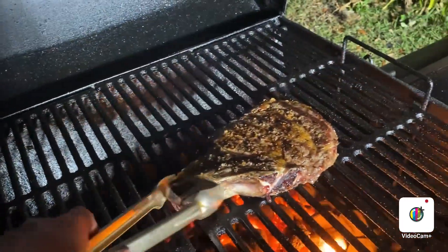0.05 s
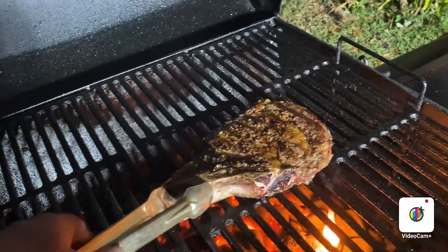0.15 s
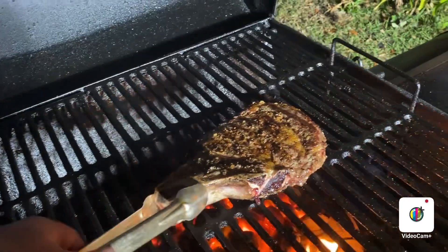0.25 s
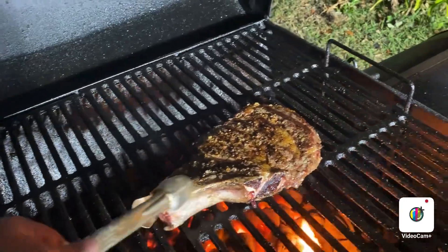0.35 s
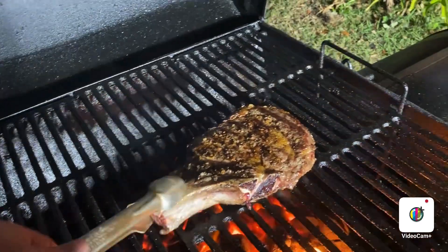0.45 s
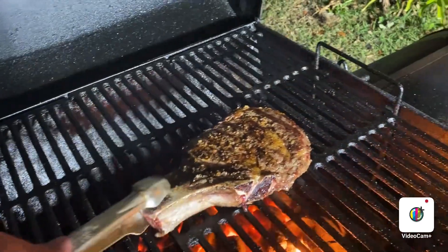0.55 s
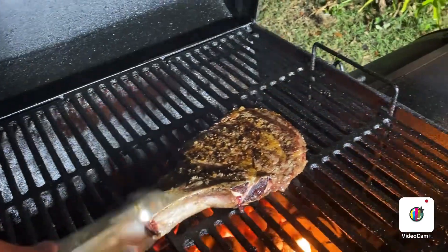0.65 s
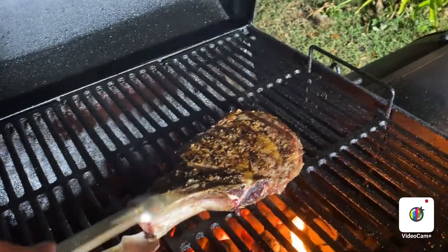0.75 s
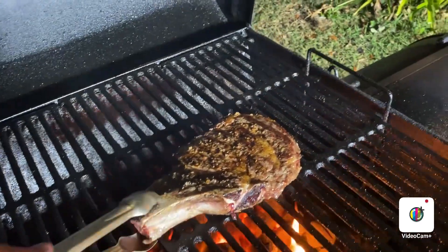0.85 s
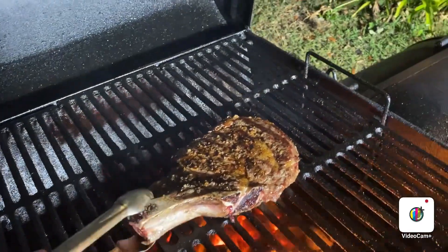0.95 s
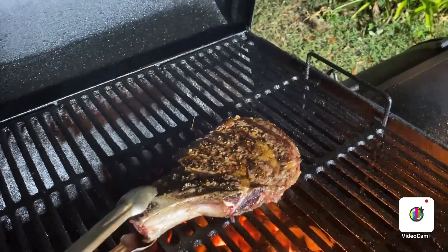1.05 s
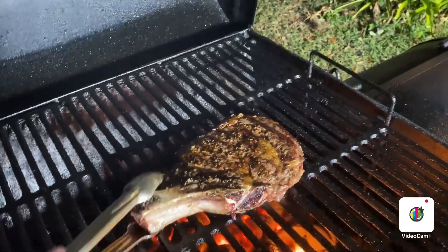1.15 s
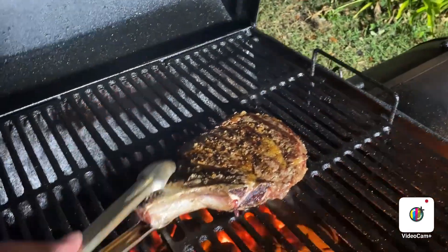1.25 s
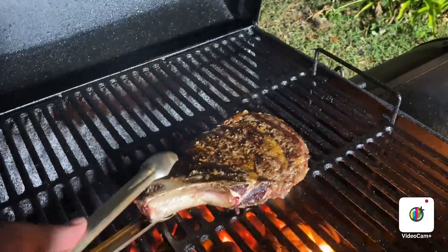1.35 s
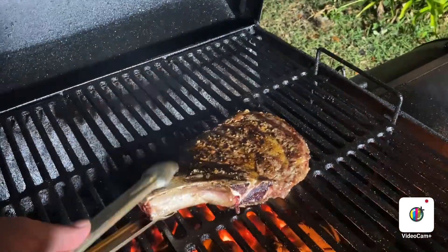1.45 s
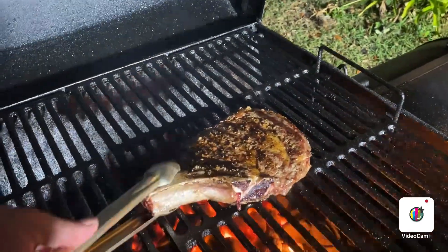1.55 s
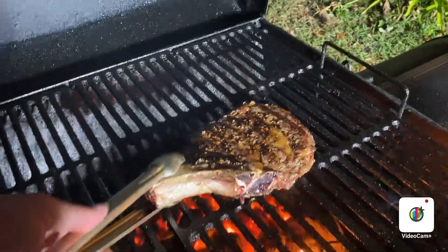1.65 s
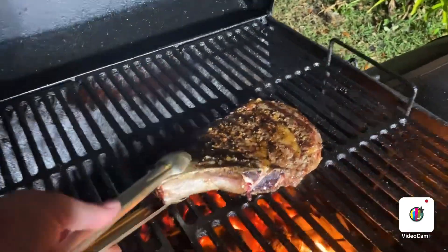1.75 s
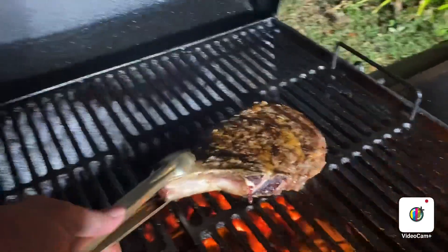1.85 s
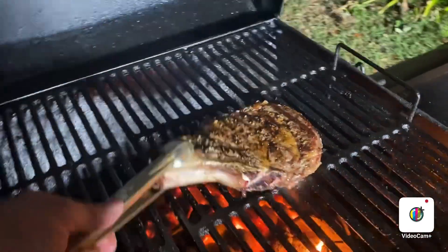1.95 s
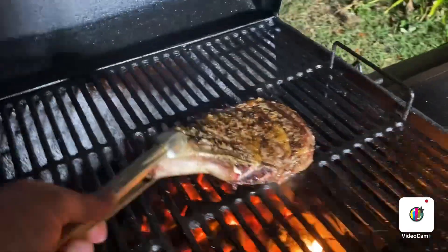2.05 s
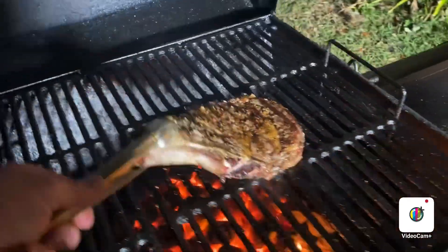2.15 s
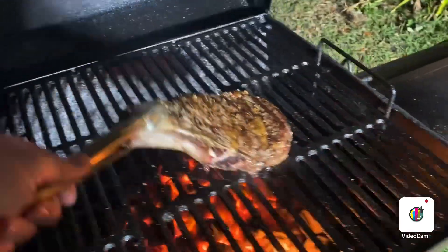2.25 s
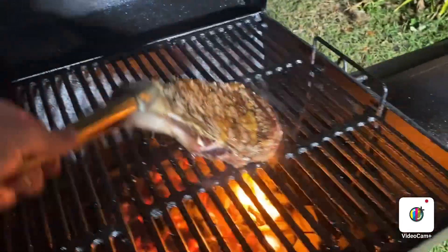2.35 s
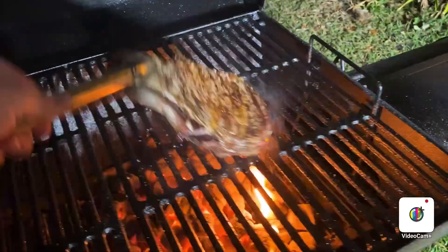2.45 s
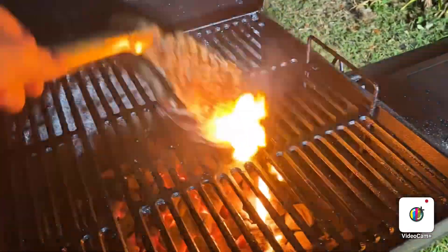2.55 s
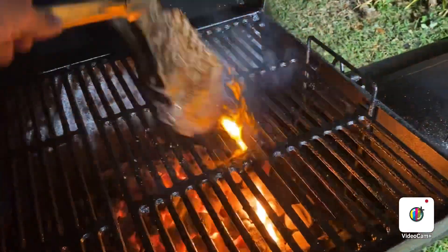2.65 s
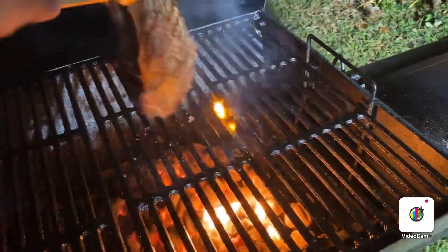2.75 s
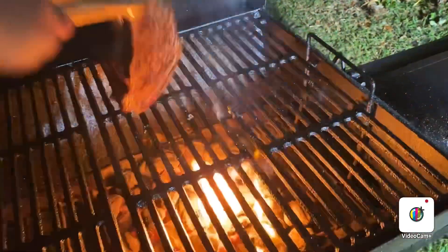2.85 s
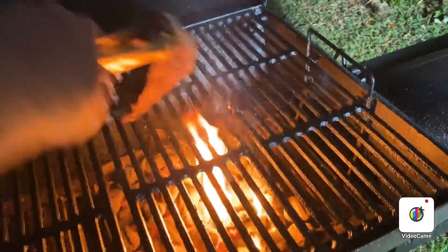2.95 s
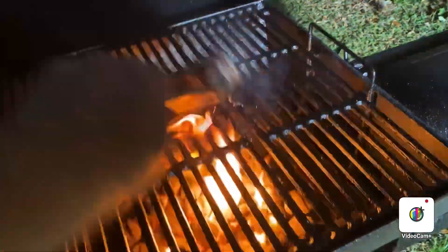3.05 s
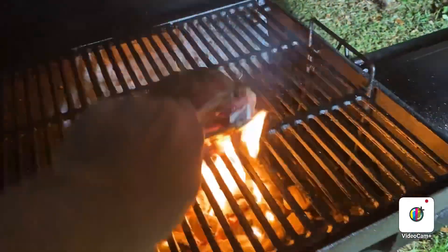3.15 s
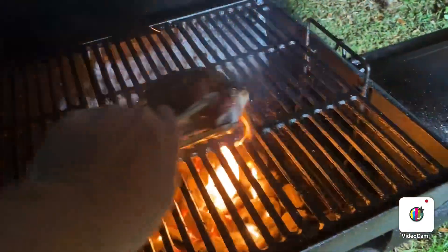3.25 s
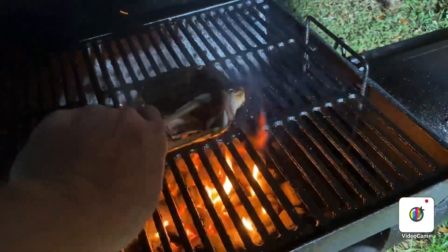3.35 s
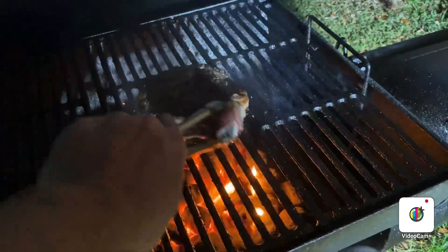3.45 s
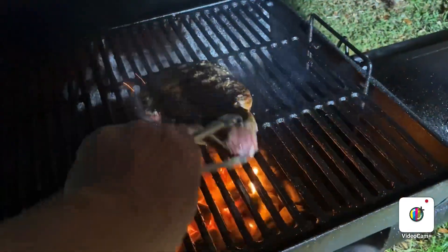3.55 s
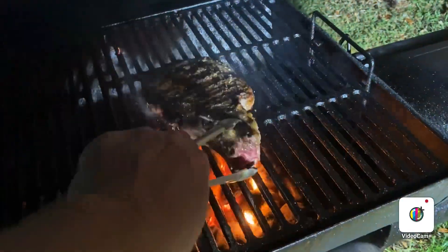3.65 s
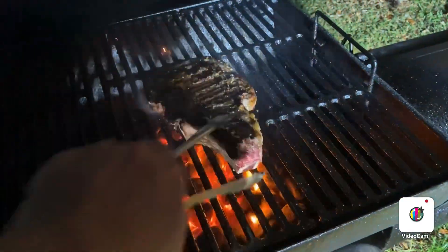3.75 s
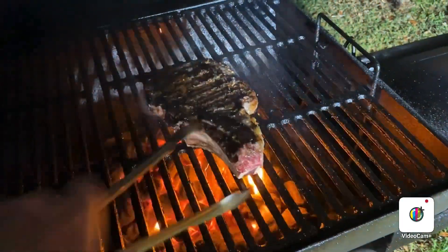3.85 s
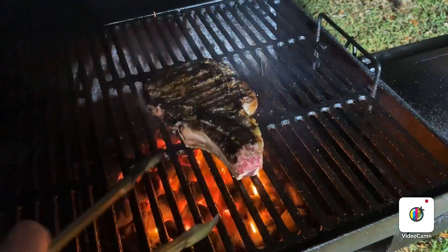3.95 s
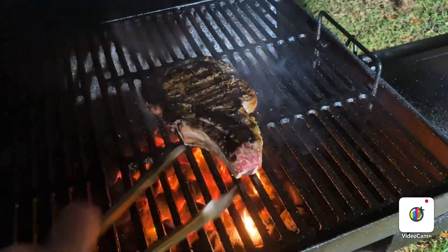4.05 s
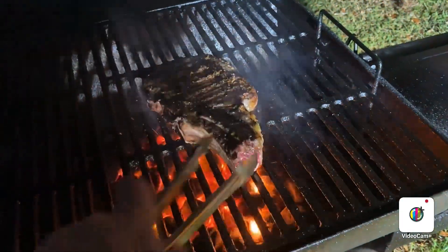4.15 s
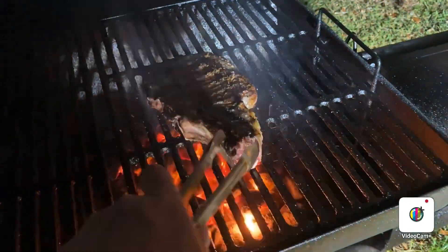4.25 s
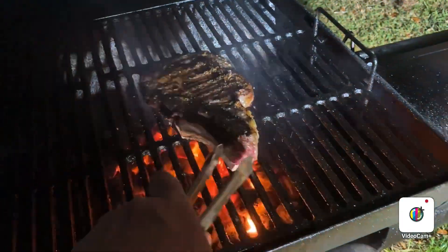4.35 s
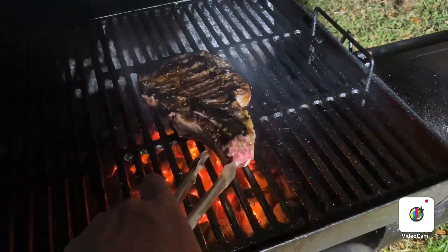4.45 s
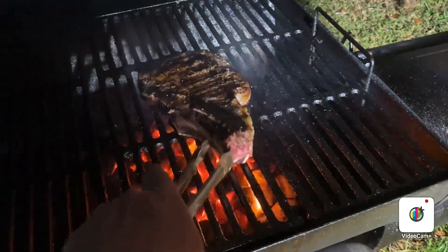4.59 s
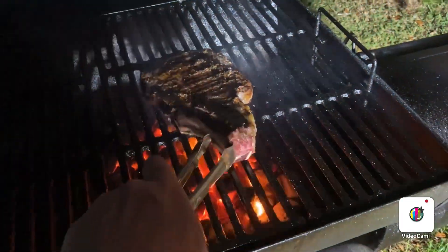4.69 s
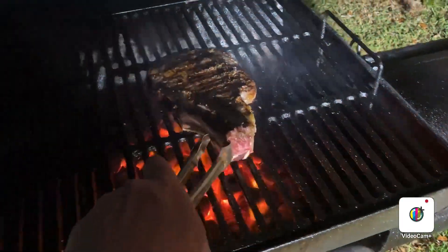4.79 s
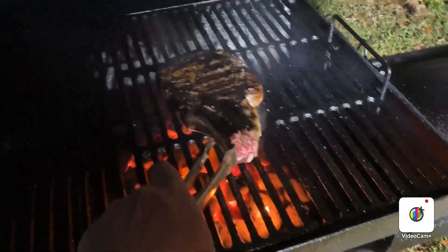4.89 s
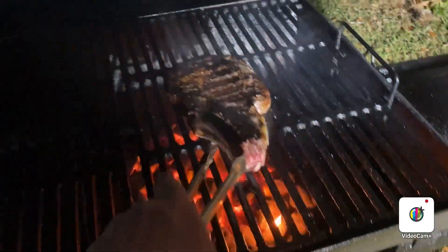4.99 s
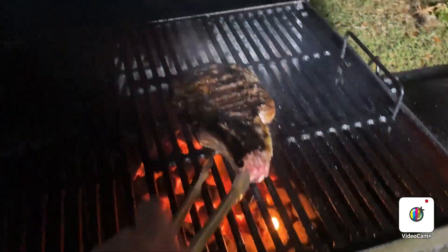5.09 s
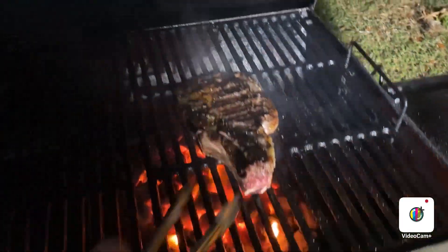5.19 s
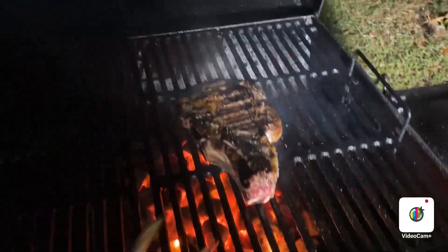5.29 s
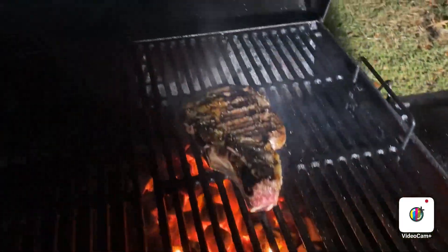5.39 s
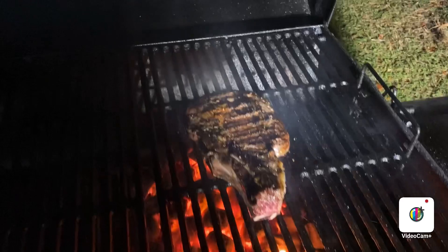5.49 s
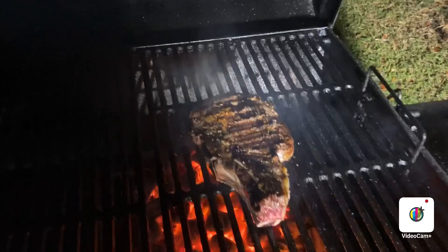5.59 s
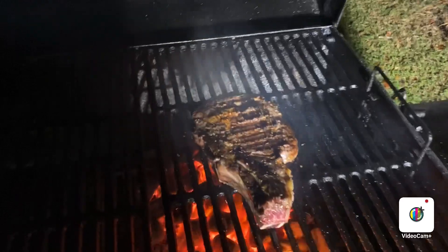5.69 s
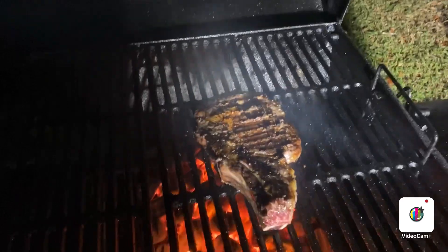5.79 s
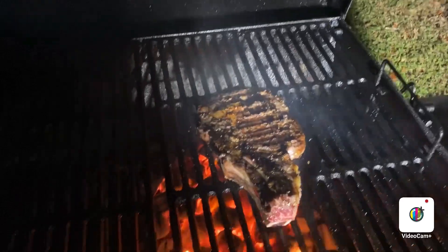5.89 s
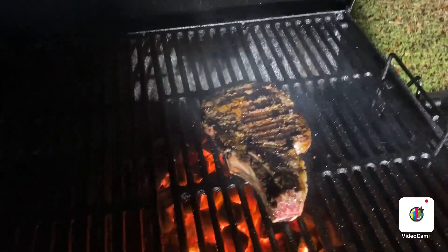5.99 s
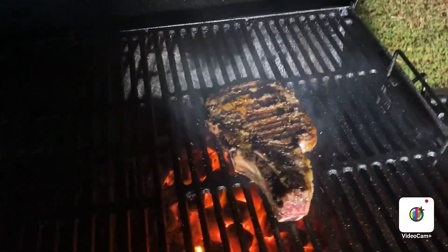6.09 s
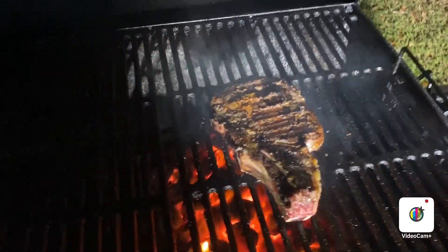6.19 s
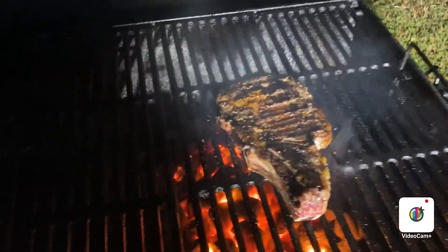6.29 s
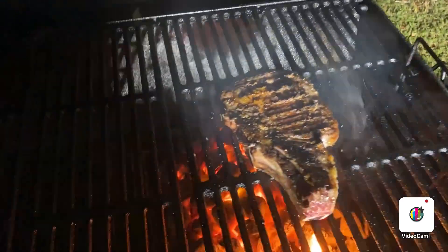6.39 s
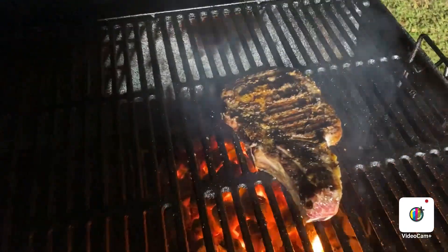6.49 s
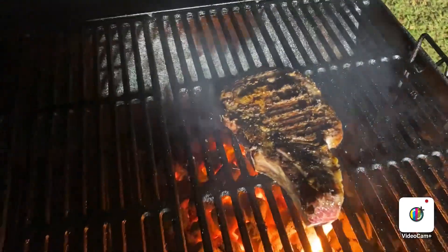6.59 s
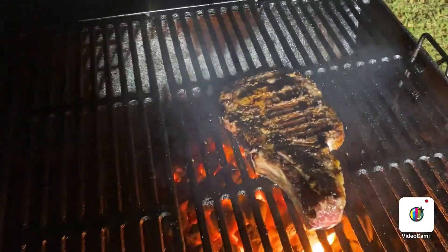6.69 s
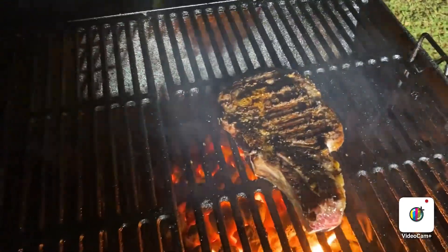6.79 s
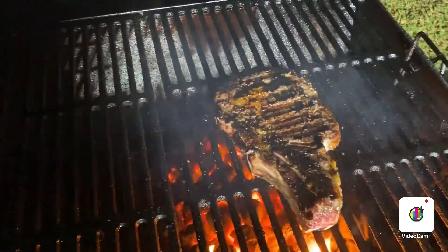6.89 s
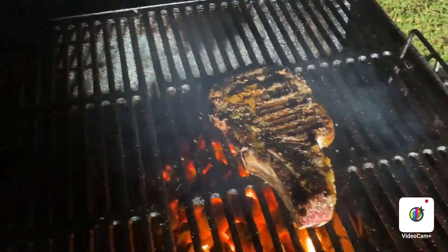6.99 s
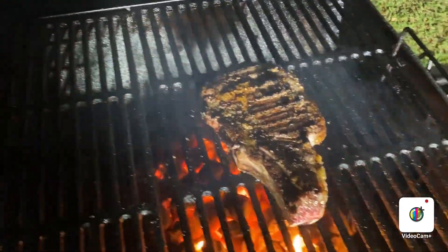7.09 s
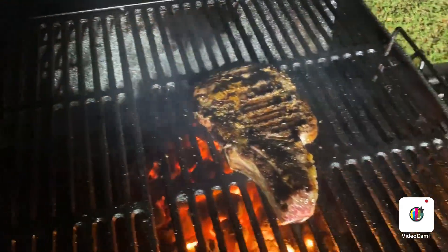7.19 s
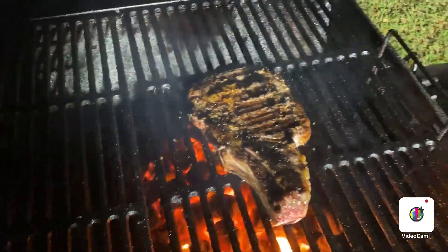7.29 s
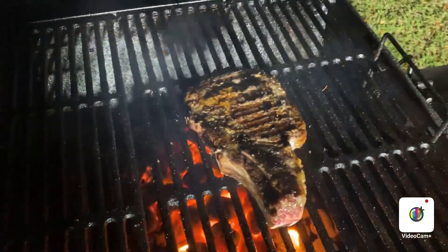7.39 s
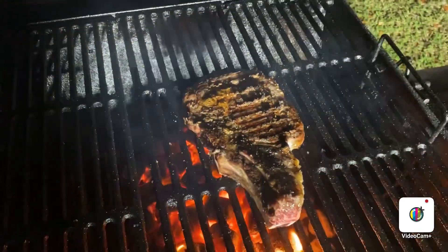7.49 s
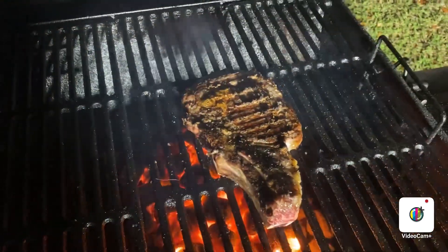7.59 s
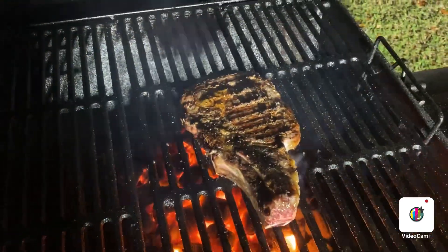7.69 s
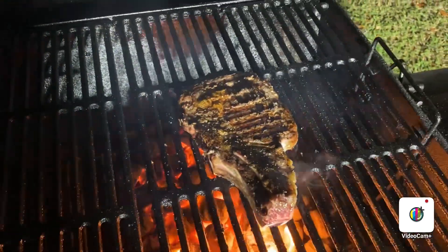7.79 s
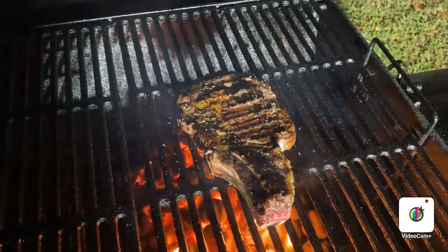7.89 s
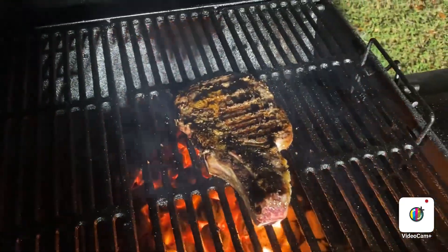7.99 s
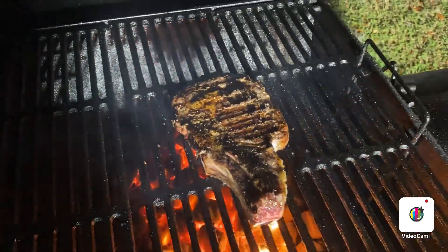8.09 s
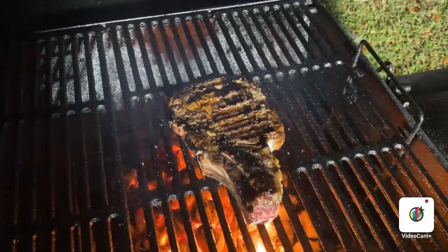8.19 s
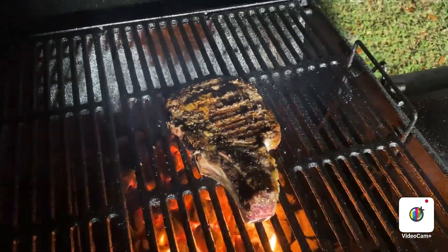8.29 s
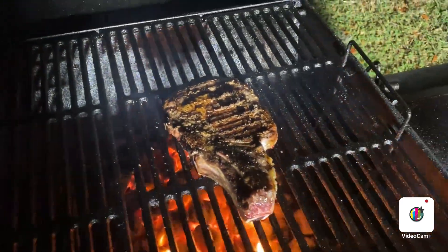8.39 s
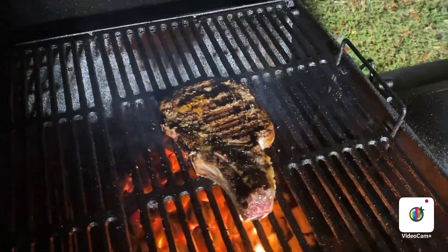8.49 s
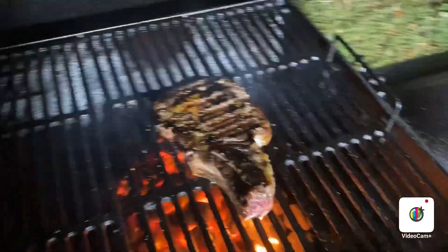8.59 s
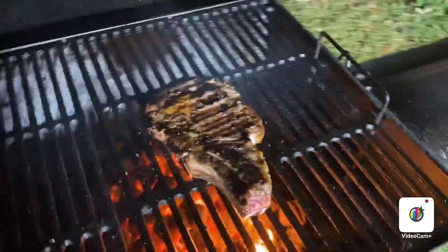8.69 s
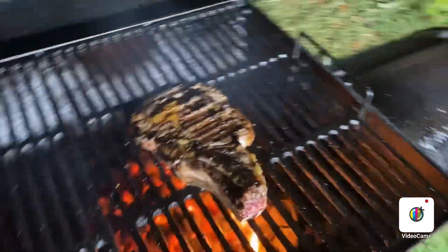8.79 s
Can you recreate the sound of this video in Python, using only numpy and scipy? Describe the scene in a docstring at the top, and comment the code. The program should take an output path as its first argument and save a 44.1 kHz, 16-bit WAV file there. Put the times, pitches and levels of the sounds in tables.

```python
"""A thick steak sizzles on a steel grate over charcoal, outdoors, heard through one small microphone.
From the start, fat and juice burst in tiny bubbles and spit, the fire box colours the lower sizzle,
and coals and far traffic rumble underneath. Steel tongs clack; near 2.5 s the steak lifts with dull
bumps and is turned. By 3.5 s it is back down: the sizzle swells and dripping fat lifts the fire's
breath. From 6.4 s three steam jets whistle; near 8.2 s the rumble swells briefly as the frying eases."""
import sys
import numpy as np
from scipy import signal
from scipy.fft import rfft, irfft, next_fast_len
from scipy.io import wavfile

SR = 44100
rng = np.random.default_rng(int(sys.argv[2]) if len(sys.argv) > 2 else 0)


def wav_record(signal):
    """Record a signal, one row per channel, as 16-bit PCM in the file named by sys.argv[1]."""
    frames = np.transpose(np.atleast_2d(signal))
    bounded = np.clip(frames, -1, 1)
    # unit amplitude maps onto the largest positive 16-bit level
    quanta = np.round(bounded * 32767).astype(np.int16)
    wavfile.write(sys.argv[1], SR, quanta)


N = 389844

# EQ curves of the four bubble layers: frequency_hz, level_db
FIZZ_EQ = [(2060, -24), (3500, -20.5), (4820, -10.5), (5200, -5), (7850, 5), (8390, 4.5), (9160, -6),
           (10000, -5.5), (13000, -12.5), (22000, -120)]
COARSE_EQ = [(350, -54), (600, -12), (1170, -9.5), (1420, -11), (1880, -7), (2040, -6.5), (3020, -6),
             (5000, -1), (6500, -4), (11000, -120)]
SPRAY_EQ = [(5180, -30.5), (8800, -4), (9330, 0), (11700, -1), (13000, -6.5)]
MIST_EQ = [(7350, -33), (12500, -4.5), (15100, 1), (15600, 2)]
# vigour of the frying, as the fader of the main fizz: time_s, level_db
FIZZ_FADER = [(0.0, -36), (0.27, -37), (0.32, -31), (0.44, -35), (0.94, -34.5), (1.06, -30.5), (1.3, -36.5),
              (1.74, -37), (1.775, -32), (1.92, -31.5), (2.44, -28.5), (2.63, -35), (2.85, -32.5),
              (2.92, -29.5), (3.1, -31.5), (3.25, -27), (3.55, -26), (4.1, -25.5), (4.5, -27), (4.7, -25.5),
              (5.61, -27.5), (5.93, -29.5), (6.42, -27.5), (6.77, -29), (7.09, -27.5), (7.9, -28.5),
              (8.2, -31), (8.84, -32.5)]
MEAN_VIGOUR_DB = -31
# the other layers ride that fader: follow_ratio, then at mean vigour before_turn_db, arm_over_db, after_db
COARSE_RIDE = (0.7053, -45, -39.5, -42)
SPRAY_RIDE = (0.94, -39, -36, -38.5)
MIST_RIDE = (0.3, -45.5, -42.5, -43.5)
# swells and dips of single layers: centre_s, half_length_s, coarse_db, spray_db, mist_db
LAYER_SURGES = [(0.85, 0.13, -3.5, -3, 5), (1.06, 0.1, -1.5, -1, 4), (2.536, 0.076, 4.5, -2, 0),
                (2.64, 0.036, 0, 1, 0), (2.73, .04, 3, -2, 0), (3.55, .03, 4, -1, 0),
                (3.692, .06, 0.5, 3, 0), (5.93, 0.28, 1.5, 0.5, 1), (8.5, .3, 1.5, 3, 3)]
# placing of steak and arm: time_s, before_turn_share, arm_over_share; the rest is after the arm leaves
STANCE_FADES = [(0, .98, .01), (2.8, 0.58, 0.37), (3.1, 0.4, 0.92), (5.25, .01, 0.88), (5.65, 0, 0.15),
                (8.84, 0.06, 0)]
# reflections off the steel lid and walls: delay_s, level_db
REFLECTIONS = [(.0029, -13.5), (.0053, -14.5), (.0091, -17.5), (0.0136, -20)]
SWAY_S = .00015   # delay wander as the hand-held microphone sways
# peaks and dips of the fire box: pitch_hz, width_hz, before_turn_db, arm_over_db, after_db
FIRE_BOX_EQ = [(756, 200, -1.5, -24, -0.5), (880, 170, -2.5, -1, 5.5), (1096, 73, -5, -4, -3.5),
               (1170, 50, -7.5, 3.5, 10.5), (1280, 73, 3, 8, -9), (1410, 120, -11, -10, -13),
               (1612, 45, 4, 5.5, 8), (1786, 60, 5.5, -0.5, 2.5), (1900, 91, 7, -6, 2),
               (2034, 97, -10, 9, -7), (2160, 88, 5, 0.5, 1.5), (2336, 200, 4, 5.5, 2.5),
               (2630, 86, 5, -4.5, 6.5), (2794, 160, 6.5, 5, 1), (3030, 100, 2, 2.5, 4),
               (3200, 115, -1.5, 1, 6), (3340, 200, -8, 1.5, -2), (3475, 80, -9, 5, 2.5),
               (3910, 170, 1.5, 5, 0), (4390, 130, -1, 4, 2), (5090, 190, -3, 4, -1.5),
               (5720, 220, -1.7, 2.5, 0), (6430, 440, -2, -0.5, -0.9)]
# low bed of coals and far traffic: frequency_hz, level_db
RUMBLE_EQ = [(12, -48), (20, -34), (41, -6), (65, 0.5), (104, -0.5), (157, -11), (335, -13), (367, -10.5),
             (455, -13.5), (972, -7.5), (1080, -14), (1160, -7.5), (1500, -12), (1950, -37), (3300, -120)]
DEEP_DB, DEEP_WAVER_DB, BREATH_FROM_HZ = -47.3, 0.9, 235
# the fire's breath, swelling as fat drips from the turned steak: time_s, level_db
BREATH_FADER = [(0.0, -52), (0.47, -57), (1.16, -56), (1.3, -54), (2.63, -50), (2.8, -51), (3.4, -48),
                (4.06, -47.5), (4.65, -48), (4.95, -53), (5.24, -50.5), (6.33, -51.5), (7.39, -51.5),
                (7.98, -50.5), (8.44, -49), (8.84, -51)]
# tongs hitting steel and bone: start_s, peak_db, pitch_hz, falloff_db_per_octave, rattle_s
TONG_HITS = [(.0438, -18, 2570, 47, .006), (.068, -30.5, 2580, 36, 0.043), (0.099, -35, 2400, 50, 0.018),
             (0.291, -27, 2100, 28, .01), (0.2971, -12, 2230, 26, 0.0035), (0.302, -27, 4090, 50, 0.012),
             (.307, -26, 1860, 80, 0.0088), (0.6543, -28, 2020, 80, 0.0074), (.7512, -38, 2460, 48, 0.0086),
             (1.977, -38, 2140, 30, .01), (2.491, -37, 1310, 58, 0.066), (3.537, -15, 5840, 30, .005),
             (3.535, -25.5, 1500, 20, 0.013), (3.553, -19, 2030, 90, 0.011)]
# ring of the steel tongs: pitch_hz, level_db, t60_s
TONG_MODES = [(1241, 0.5, .08), (1865, 4.5, 0.037), (1960, 1, 0.028), (2103, -2.5, 0.041),
              (2440, -1.5, 0.029), (2834, -4.5, 0.038), (4060, 4, 0.028), (5440, 0.5, 0.039),
              (6200, -1, 0.039)]
# dull bumps while the steak is handled; the last row is a brief deep swell in the background rumble:
# start_s, peak_db, pitch_hz, length_s
LOW_HITS = [(.045, -37.5, 486, 0.16), (.08, -43, 810, 0.062), (2.305, -32, 146, 0.047),
            (2.308, -38, 330, .05), (2.326, -31.5, 150, 0.041), (2.485, -40.5, 320, .06),
            (2.512, -38.5, 700, 0.08), (2.52, -37.5, 140, 0.051), (2.552, -39, 340, 0.064),
            (2.881, -42, 322, 0.04), (3.037, -40.5, 370, 0.047), (8.212, -34.5, 62, .12)]
# low resonances, the deepest for the rumble's swell, the rest the grate's: pitch_hz, level_db, t60_s
LOW_MODES = [(61.7, 0, .3), (111, 1, .15), (146, 2, .15), (183, -11, 0.12), (302, 2, .2), (370, 1.5, .2),
             (497, -1.5, 0.089), (617, 0, .1), (815, 0, 0.091)]
BUMP_FALL_DB = 21   # per octave away from the hit's pitch
# featured fat spits: start_s, peak_db, coarse_offset_db, fine_offset_db
LOUD_SPITS = [(0.048, -21, 2, -16), (0.215, -17.5, -3, -14), (0.226, -21, -8, -14),
              (0.297, -14.5, -10, -18), (0.3494, -23, -12, -14), (0.44, -16, -16, -15),
              (0.5194, -24, -23, -15), (0.546, -22, -20, -11), (0.624, -19, -18, -15),
              (0.7094, -21, -2, -16), (0.873, -22, -23, -15), (0.9, -15.5, -23, -14),
              (1.0031, -26, -24, -13), (1.0685, -17, -18, -16), (1.1304, -22, -17, -16),
              (1.359, -16, -13, -20), (1.4114, -22, -21, -15), (1.554, -21, -7, -17), (1.679, -25, -8, -13),
              (1.785, -24, -19, -14), (1.946, -15, -31, -22), (1.9764, -27, -7, -12),
              (2.063, -20, -17, -18), (2.122, -16, -26, -17), (2.2014, -21, -25, -17),
              (2.432, -22, -27, -12), (2.491, -25, 5, -17), (2.544, -18, -4, -18), (2.692, -23, -14, -14),
              (3.1394, -18, -24, -16), (3.5379, -14, -9, -20), (3.547, -20, -6, -14),
              (4.7244, -15, -19, -17), (5.36, -24, -29, -11), (6.832, -22, -7, -21), (7.353, -21, -29, 4),
              (7.643, -15, -22, -11), (7.764, -14, -22, -15), (7.9694, -24, -19, 6), (8.276, -26, -22, -3),
              (8.34, -28, -20, -1), (8.48, -21, -13, -13)]
SPIT_S, SPIT_CREST_DB = 0.016, 15.5   # crest: a spit's peak above its rms
SMALL_SPITS_PER_S, SMALL_SPIT_DB, SMALL_SPREAD_DB = 7, -26.5, 4
SMALL_COARSE_DB, SMALL_FINE_DB = -20, -13
# steam whistling out of the crust: centre_s, half_length_s, level_db, pitch_hz
STEAM_JETS = [(1.04, .09, -41, 14800), (6.422, 0.12, -38.5, 10600), (7.04, 0.15, -34.5, 10600),
              (7.58, 0.16, -35.5, 11300)]
JET_WIDTH_HZ = 3400
CUTOFF_HZ = 15750


def amp(db):
    """Decibels to gain."""
    return 10 ** (np.asarray(db) / 20)


def rms_one(x):
    """Scale to unit rms."""
    return x / np.sqrt(np.mean(x ** 2) + 1e-20)


def automation(rows):
    """One per-sample curve for each column after time_s."""
    times, *columns = np.transpose(rows)
    return [np.interp(np.arange(N) / SR, times, column) for column in columns]


def equalise(x, curve):
    """Shape a steady stream with an EQ curve; rms 1."""
    size = next_fast_len(N)
    hz, db = np.transpose(curve)
    bins_hz = np.maximum(np.arange(size // 2 + 1) * SR / size, 1)
    gain = amp(np.interp(np.log(bins_hz), np.log(hz), db))
    return rms_one(irfft(rfft(x, size) * gain, size)[:N])


def drift(rate_hz):
    """Smooth random modulation; spread 1."""
    hop = 40   # samples per control step
    pole = np.exp(-2 * hop * np.pi * rate_hz / SR)
    slow = signal.lfilter([1], [1, -2 * pole, pole * pole], rng.standard_normal(N // hop + 2002))[2000:]
    return np.interp(np.arange(N) / hop, np.arange(len(slow)), rms_one(slow))


def resonance(x, hz, width_hz):
    """Two-pole band-pass, unity gain at its peak."""
    r = np.exp(-np.pi * width_hz / SR)
    feedback = [1, -2 * r * np.cos(2 * np.pi * hz / SR), r * r]
    return signal.lfilter(np.array([1, 0, -1]) * (1 - r * r) / 2, feedback, x)


def bell_fade(centre_s, half_s):
    """Bell-shaped fade in and out."""
    return np.exp(-((np.arange(N) / SR - centre_s) / half_s) ** 2)


def swell(length_s, rise):
    """Fast attack, dying within about length_s; rise is a share of that length."""
    t = np.arange(SR // 4) / SR / max(length_s, .001)
    return (1 - np.exp(-t / rise)) * np.exp(-3.0 * t)


def puff(length_s, rise):
    """A short swell of noise."""
    shape = swell(length_s, rise)
    return rng.standard_normal(len(shape)) * shape


def add(out, sound, start_s, peak_db):
    """Drop a one-shot into the track at the given peak."""
    at = round(start_s * SR)
    out[at:at + len(sound)] += (amp(peak_db) * sound / np.max(np.abs(sound)))[:N - at]


def bubbles(per_s, spread_db):
    """Bubbles burst as clicks of uneven size at random moments."""
    sizes = amp(spread_db * np.minimum(rng.exponential(1, N), 5)) * rng.choice([-1, 1], N)
    return sizes * (rng.random(N) < per_s / SR)


def stance():
    """Crossfade of three placings: before the turn, arm over the grate, arm gone."""
    before, arm_over = automation(STANCE_FADES)
    return np.array([before, arm_over, 1 - before - arm_over])


def bubble_levels():
    """Faders in dB: fizz is the vigour; coarse, spray and mist follow it and add their own surges."""
    fizz_db, = automation(FIZZ_FADER)
    shares = stance()
    levels = np.array([follow * (fizz_db - MEAN_VIGOUR_DB) + np.array(placed_db) @ shares
                       for follow, *placed_db in (COARSE_RIDE, SPRAY_RIDE, MIST_RIDE)])
    for centre_s, half_s, *surge_db in LAYER_SURGES:
        levels += np.outer(surge_db, bell_fade(centre_s, half_s))
    return fizz_db, *levels


def walls(x):
    """Short wandering echoes off the steel lid and walls ripple the hiss."""
    out, now = x.copy(), np.arange(N)
    for delay_s, db in REFLECTIONS:
        delayed = np.round(now - SR * (delay_s + SWAY_S * drift(.4))).astype(int)
        out += amp(db) * x[np.clip(delayed, 0, N - 1)]
    return rms_one(out)


def fire_box(x):
    """The steel box acts as an EQ that shifts with the placing of steak and arm."""
    shares = stance()
    return x + sum((amp(lifts_db) - 1) @ shares * resonance(x, hz, width_hz)
                   for hz, width_hz, *lifts_db in FIRE_BOX_EQ)


def sizzle():
    """Four bubble sizes share the fat's sputter and flicker on their own; spits and steam ride on top."""
    fizz_db, coarse_db, spray_db, mist_db = bubble_levels()
    fizz_spit, coarse_spit, fine_spit = fat_spits()
    sputter = .5 * drift(7.2) + 0.33 * drift(46)
    fizz = walls(equalise(bubbles(14000, spread_db=1.5), FIZZ_EQ))
    fizz *= amp(fizz_db + 0.32 * sputter + 0.5 * drift(18)) + fizz_spit
    coarse = walls(equalise(bubbles(9000, spread_db=2.5), COARSE_EQ))
    coarse *= amp(coarse_db + 0.57 * sputter + 0.65 * drift(13)) + coarse_spit
    fine = bubbles(15000, spread_db=2.5)
    spray = equalise(fine, SPRAY_EQ) * (amp(spray_db + 1.5 * sputter + .5 * drift(11)) + .7 * fine_spit)
    mist = equalise(fine, MIST_EQ) * (amp(mist_db + .7 * sputter + .5 * drift(14)) + .6 * fine_spit)
    return fire_box(fizz + coarse) + spray + mist + steam_jets(fine)


def rumble():
    """A deep bed of coals and far traffic, with the fire's dull breath above the crossover."""
    breath_db, = automation(BREATH_FADER)
    noise = equalise(rng.standard_normal(N), RUMBLE_EQ)
    crossover = [signal.butter(4, BREATH_FROM_HZ, kind, fs=SR, output="sos") for kind in ("low", "high")]
    deep, breath = (rms_one(signal.sosfilt(band, noise)) for band in crossover)
    return amp(DEEP_DB + DEEP_WAVER_DB * drift(3.8)) * deep + amp(breath_db + 0.55 * drift(2.7)) * breath


def ring_modes(hit, modes, pitch_hz, fall_db, band_share):
    """A hit rings a bank of modes, fall_db weaker per octave away from its pitch."""
    ring = 0
    for hz, mode_db, t60_s in modes:
        drive = resonance(hit, hz, band_share * hz)
        mode = rms_one(resonance(drive, hz, np.log(1000) / np.pi / t60_s))
        ring += amp(mode_db - fall_db * np.abs(np.log2(hz / pitch_hz))) * mode
    return ring


def tong_clacks():
    """Each contact is a brief rattle that sets the tongs ringing."""
    out = np.zeros(N)
    for start_s, peak_db, pitch_hz, fall_db, rattle_s in TONG_HITS:
        rattle = puff(rattle_s, rise=0.093)
        rattle[1] += 3.0   # the first touch is one sharp tick
        add(out, ring_modes(rattle, TONG_MODES, pitch_hz, fall_db, band_share=0.17), start_s, peak_db)
    return out


def low_bumps():
    """Soft puffs ring low modes: dull bumps on the grate, then a deep swell in the rumble near 8.2 s."""
    out = np.zeros(N)
    for start_s, peak_db, pitch_hz, length_s in LOW_HITS:
        push = puff(length_s, rise=0.1)
        add(out, ring_modes(push, LOW_MODES, pitch_hz, BUMP_FALL_DB, band_share=0.53), start_s, peak_db)
    return out


def fat_spits():
    """Flurries of bursting, loud ones cued, small ones random: extra gain for fizz, coarse and fine."""
    gains = np.zeros((3, N))
    chance = rng.random((round(SMALL_SPITS_PER_S * N / SR), 2))
    small = [(when * N / SR, SMALL_SPIT_DB + SMALL_SPREAD_DB * (2 * size - 1),
              SMALL_COARSE_DB, SMALL_FINE_DB) for when, size in chance]
    for start_s, peak_db, coarse_db, fine_db in LOUD_SPITS + small:
        for gain, offset_db in zip(gains, (0, coarse_db, fine_db)):
            add(gain, swell(SPIT_S, rise=0.1), start_s, peak_db + offset_db - SPIT_CREST_DB)
    return gains


def steam_jets(fine):
    """Steam leaves the crust: a broad high band of the fine bubbles fades in and out."""
    out = np.zeros(N)
    for centre_s, half_s, db, hz in STEAM_JETS:
        band = resonance(resonance(fine, hz, JET_WIDTH_HZ), hz, JET_WIDTH_HZ)
        out += amp(db) * bell_fade(centre_s, half_s) * rms_one(band)
    return out


def scene():
    """The mix at one microphone: both channels alike."""
    mono = sizzle() + tong_clacks() + low_bumps() + rumble()
    return np.array([mono, mono])


def record(dry):
    """A steep high cut on the master."""
    return signal.sosfilt(signal.ellip(14, .3, 80, CUTOFF_HZ, fs=SR, output="sos"), dry)


dry = scene()
out = record(dry)
wav_record(out)
```